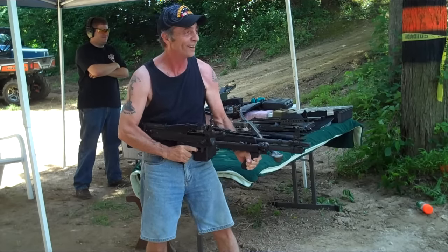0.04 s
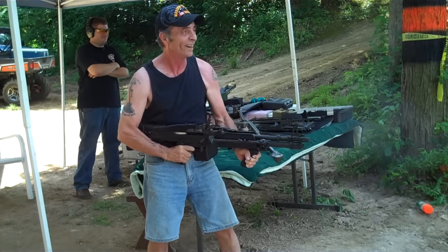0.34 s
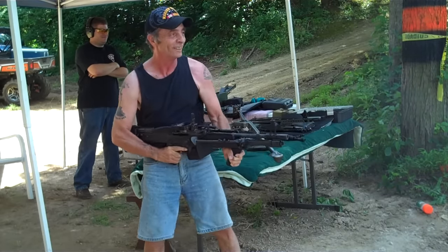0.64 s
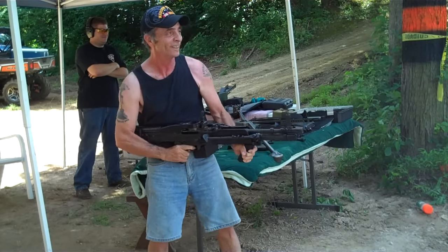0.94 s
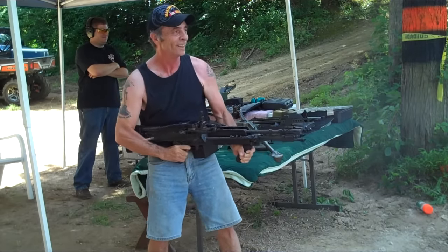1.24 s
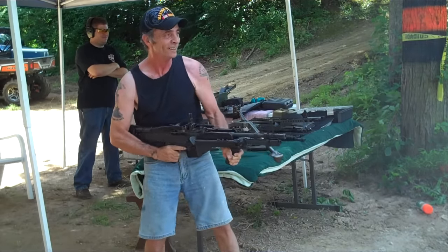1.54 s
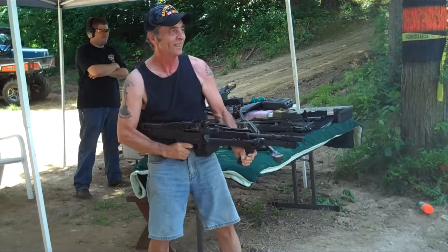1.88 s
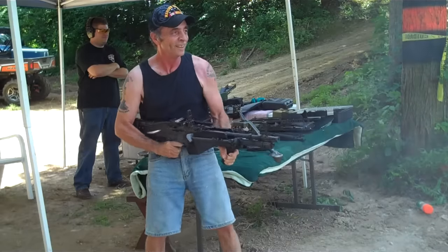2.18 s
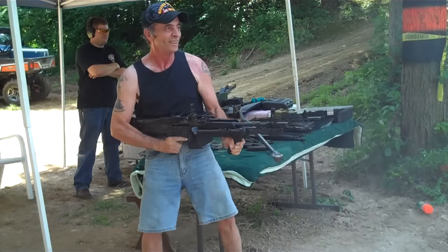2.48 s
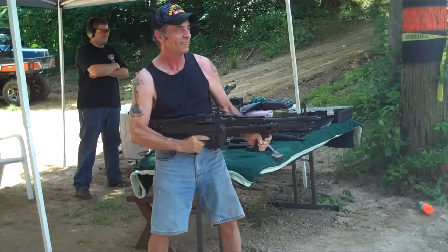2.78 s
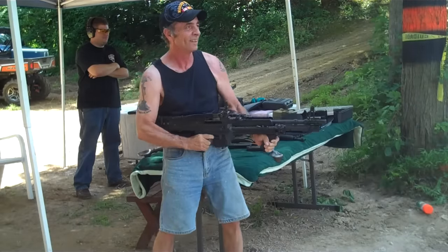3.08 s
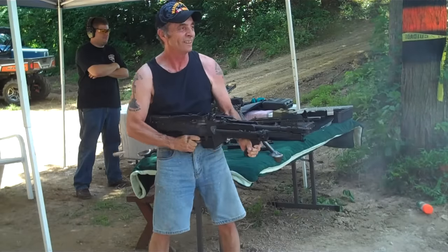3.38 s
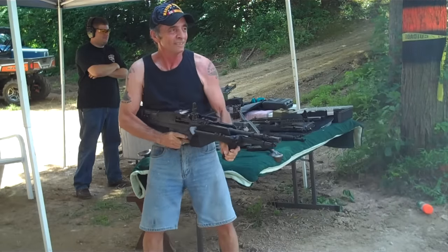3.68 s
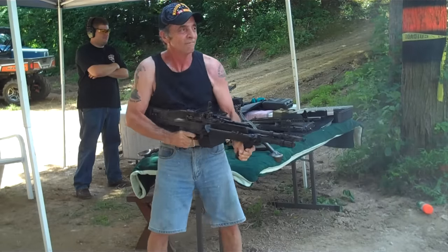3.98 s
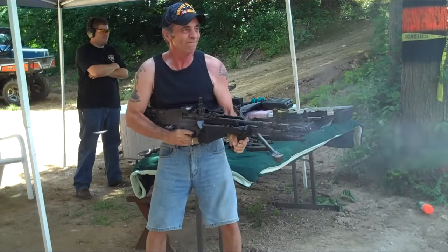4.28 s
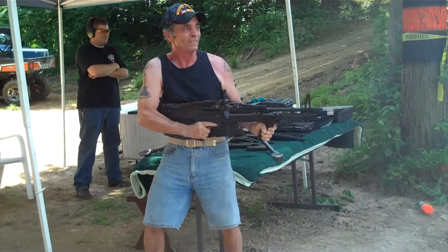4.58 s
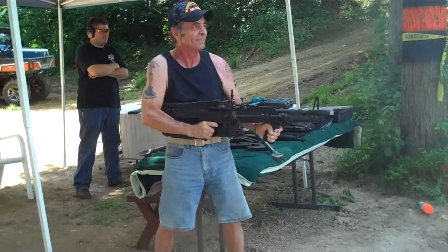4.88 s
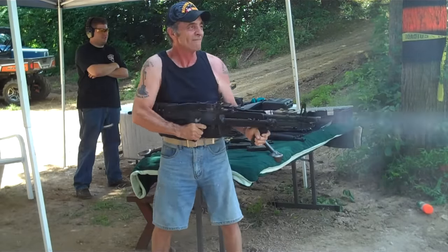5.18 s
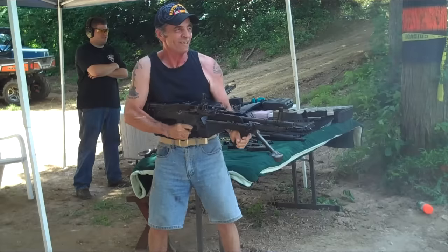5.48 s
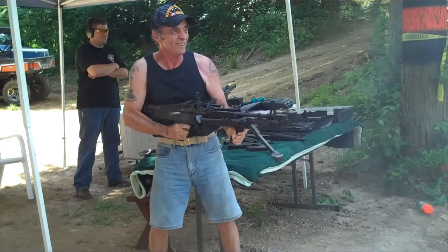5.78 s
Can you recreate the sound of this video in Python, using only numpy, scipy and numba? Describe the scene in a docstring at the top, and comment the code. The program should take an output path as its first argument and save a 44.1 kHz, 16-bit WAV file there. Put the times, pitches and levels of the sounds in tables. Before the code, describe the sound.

Six rapid bursts of close machine gun fire, with metallic bolt clacks, a rolling outdoor echo and the faint tinkle of empty cases.

```python
"""A faint hiss of leaves, then a steel clack and a loud burst from a belt-fed machine gun a few metres away.
It fires six bursts, about nine rounds a second. Each opens with the bolt, the sliding steel block that
loads the gun, running forward and slamming shut. Every blast bounces back from the ground, an earth
bank and wooded slopes, and a few empty brass cases tinkle down. It is all so loud that the
microphones of a small stereo camera overload and the camera turns its own volume down."""
import sys
import numpy as np
from scipy import signal
from scipy.fft import rfft, irfft
from scipy.io import wavfile
from scipy.ndimage import uniform_filter1d
from numba import njit

SR = 44100
rng = np.random.default_rng(int(sys.argv[2]) if len(sys.argv) > 2 else 0)


def unload_audio(sound):
    """Save the sound as a 16-bit wav file, at the path given as the first command line argument."""
    columns = np.transpose(np.atleast_2d(sound))
    # keep every value between -1 and 1, then stretch to whole-number steps
    steps = np.round(np.clip(columns, -1, 1) * 32767)
    wavfile.write(sys.argv[1], SR, steps.astype(np.int16))


N = 257263

# Levels are relative. A fade time (t60) is how long a sound takes to drop by 60 dB.
# tone colours, how strong each noise is from bass to treble: (frequency [Hz], level [dB])
AIR_COLOUR = [(18, -41), (30, -11), (172, 2), (656, -8), (806, -10), (917, -10.5), (6150, -24.5),
              (14000, -25)]
WOODS_COLOUR = [(60, -38), (110, -14.5), (200, -19), (270, -5.5), (390, -3), (465, -2), (560, 1.5),
                (750, -1.5), (950, -4.5), (1300, -6.5), (2500, -32), (6000, -56)]
SLAP_COLOUR = [(120, -7.5), (270, -3.5), (410, 0.5), (465, 9), (540, -1), (750, -1), (1000, -7.5),
               (2500, -28.5)]
LEAF_COLOUR = [(100, 13.5), (400, 12.5), (1000, 4), (2000, 7.5), (4000, 4.5), (6000, 0.5), (8000, -5),
               (10000, -7.5), (14000, -20)]
FAR_LEAF_COLOUR = [(200, -34), (800, 0.5), (2000, 8), (4000, 1), (6000, -6.5), (8000, -8.5), (10000, -18),
                   (14000, -87)]
TRUNK_COLOUR = [(300, -19), (550, 4.5), (780, 6.5), (1150, 4), (1800, -23), (4000, -39)]
GROUND_COLOUR = [(20, -24), (60, -5), (140, 7), (300, -4), (600, 11), (1000, 9.5), (2000, 0), (5000, 3)]
METAL_COLOUR = [(100, -43), (500, -7), (1000, 2.5), (2500, 5), (4000, -0.5), (6000, 2), (9000, -5.5),
                (14000, 3.5)]
GUST_COLOUR = [(25, -4), (40, -0.5), (70, -7.5), (130, -7), (300, -11), (1000, -32.5)]
CRACK_COLOUR = [(100, -24), (300, 2), (900, 4), (1500, 4.5), (3000, -5.5), (6000, -8.5), (9000, -7),
                (14000, -8)]
# separate echoes from the far slopes: (delay [s], level [dB])
SLOPE_ECHOES = [(.237, -22.5), (.337, -17), (.375, -18)]
# low pulses thrown back by the bank: (delay [s], pitch [Hz], half-length [s], level [dB])
BANK_PULSES = [(.073, 183, 0.0016, -2), (.085, 147, 0.0024, -10), (.0895, 255, .005, -3),
               (.093, 299.8, 0.052, -17.5)]
# empty cases landing: (time [s], level [dB], pitch multiplier)
CASE_LANDINGS = [(2.785, -42, .96), (3.0655, -28, 1), (4.909, -39, .94)]
# ringing tones of a brass case and of the gun's steel body: (base pitch [Hz], level [dB], fade time [s])
BRASS_TONES = [(5940, -17, .35), (9700, -12, .2), (11150, 1, .35), (14070, 9, .4)]
GUN_BODY_TONES = [(1270, -42, 0.051), (1823, -22, 0.45), (2240, -36, 0.21), (2770, -33, 0.074),
                  (5620, -16, 0.075), (5630, -38, .08)]
# bursts of fire; the bolt "feeds" when it meets the ammunition belt, and a "lead" is time before firing:
# (first shot [s], last shot [s], number of shots, feed lead [s], feed level [dB], lock level [dB])
GUN_BURSTS = [(.376, .4897, 2, .042, 4, 7), (1.2358, 1.462, 3, .0425, 4, 6.5),
              (1.9777, 2.4177, 5, .0412, -5, -1), (3.2339, 3.5678, 4, .0505, 2.5, 3),
              (4.0373, 4.476, 5, .0392, -7.5, -5.5), (5.0395, 5.727, 7, .0418, -4.5, 4)]
# the small hollows in front of the microphones, left then right: (resonance [Hz], width [Hz])
MIC_PORTS = [(7800, 1120), (6160, 1100)]


def undb(db):
    """Turn decibels into a number to multiply by."""
    return 10 ** (np.asarray(db) / 20)


def noise(colour, apart_hz, size=N):
    """Stereo noise of strength 1; left and right are alike well below apart_hz and unrelated above."""
    f = np.fft.rfftfreq(size, 1 / SR) + 1
    hz, db = np.transpose(colour)
    bass_cut = np.minimum(f / hz[0], 1) ** 2
    gain = undb(np.interp(np.log(f), np.log(hz), db)) * bass_cut
    mid, side = rfft(rng.standard_normal((2, size)))
    side = side * f / np.hypot(f, apart_hz)
    x = irfft(np.array([mid + side, mid - side]) * gain, size)
    return x / x.std()


def add(out, at_s, sound):
    """Mix a sound in at the given time."""
    i = int(at_s * SR)
    out[..., i:i + sound.shape[-1]] += sound[..., :N - i]


def swell(t, rise_s, t60_s):
    """A loudness curve that builds up, peaks at 1 and dies away."""
    curve = (1 - np.exp(-(t / rise_s) ** 2)) * undb(-60 * t / t60_s)
    return curve / curve.max()


def flicker(depth_db, smooth_samples, size):
    """A random wobble in loudness that makes a sound rough."""
    wobble = uniform_filter1d(rng.standard_normal(size), size=smooth_samples)
    return undb(depth_db * wobble / wobble.std())


def repeat(shots, response):
    """Play the same stereo sound after every shot."""
    return signal.fftconvolve(shots[None], response, axes=1)[:, :N]


def pile_up(shots, envelope):
    """Start a loudness curve at every shot; where unrelated noises overlap, their powers add."""
    return np.sqrt(np.abs(signal.fftconvolve(shots ** 2, envelope ** 2)[:N]))


def ring(tones, pitch_ratio, t):
    """Struck metal rings with a few fading tones, which reach the two microphones out of step."""
    phases = rng.uniform(0, 2 * np.pi, (len(tones), 2, 1))
    return sum(undb(db - 60 * t / t60_s) * np.sin(2 * np.pi * hz * pitch_ratio * t + phase)
               for (hz, db, t60_s), phase in zip(tones, phases))


def outdoors():
    """Quiet air, a faint steady whine, and an opening hiss from the trees that dies away."""
    t = np.arange(N) / SR
    air = undb(-56) * noise(AIR_COLOUR, apart_hz=1500)
    whine = undb(-64) * np.sin(2 * np.pi * 819 * t)
    hiss = undb(-54.5 - 60 * t / 0.71) * noise(FAR_LEAF_COLOUR, apart_hz=2500)
    return air + whine + hiss


def hills(shots):
    """Wooded slopes send the middle pitches of each blast back as a long roll and a few hollow slaps."""
    t = np.arange(3 * SR) / SR
    roll = pile_up(shots, swell(t, rise_s=0.048, t60_s=4.22)) * noise(WOODS_COLOUR, apart_hz=2860)
    slap_curve = sum(undb(db) * swell(np.maximum(t - delay_s, 0), rise_s=0.0038, t60_s=0.14)
                     for delay_s, db in SLOPE_ECHOES)
    slaps = pile_up(shots, slap_curve) * noise(SLAP_COLOUR, apart_hz=2700)
    return undb(-24) * roll + slaps


def leaves(shots):
    """Leaves scatter the treble: a loud wash from the nearest trees, a long hiss from those behind."""
    t = np.arange(3 * SR) / SR
    near = pile_up(shots, swell(t, rise_s=0.022, t60_s=0.29)) * noise(LEAF_COLOUR, apart_hz=1820)
    middle = pile_up(shots, swell(t, rise_s=0.091, t60_s=1.125)) * noise(LEAF_COLOUR, apart_hz=2530)
    far = pile_up(shots, swell(t, rise_s=0.12, t60_s=5.2)) * noise(FAR_LEAF_COLOUR, apart_hz=2600)
    return undb(-2.5) * near + undb(-17) * middle + undb(-30) * far


def trunks(shots):
    """Tree trunks throw the middle pitches of each blast back as quick, ragged claps."""
    t = np.arange(16384) / SR
    ragged = flicker(depth_db=2.6, smooth_samples=120, size=len(t))
    cut_short = 1 / (1 + (t / 0.092) ** 6)
    claps = swell(t, rise_s=0.02, t60_s=0.73) * cut_short * ragged
    return undb(-10.5) * pile_up(shots, claps) * noise(TRUNK_COLOUR, apart_hz=700)


def earth_bank(shots):
    """The earth bank sends back only the bass, as a short boom just before the next shot is due."""
    t = np.arange(8192) / SR
    boom = np.zeros(len(t))
    for delay_s, hz, half_length_s, db in BANK_PULSES:
        hump = np.exp(-((t - delay_s) / half_length_s) ** 2)
        boom += undb(db) * hump * np.cos(2 * np.pi * hz * (t - delay_s))
    return repeat(shots, np.array([boom, boom]))


def ground(shots):
    """The ground nearby returns a dense thud, partly the same on every shot, and a brief rumble."""
    t = np.arange(SR) / SR
    cut_short = 1 / (1 + (t / 0.1) ** 6)
    thud_curve = swell(t, rise_s=0.013, t60_s=0.62) * cut_short
    rumble_curve = undb(-9.5) * swell(t, rise_s=0.2, t60_s=0.64)
    same_part = repeat(shots, thud_curve * noise(GROUND_COLOUR, apart_hz=398, size=len(t)))
    varying_part = pile_up(shots, thud_curve + rumble_curve) * noise(GROUND_COLOUR, apart_hz=169)
    return undb(-19) * same_part + undb(-13.5) * varying_part


def cases():
    """Empty brass cases thrown out by the gun land with a tick and a thin ring."""
    out, t = np.zeros((2, N)), np.arange(SR // 2) / SR
    for at_s, db, pitch_ratio in CASE_LANDINGS:
        tick = swell(t, rise_s=0.00045, t60_s=0.02) * noise(METAL_COLOUR, apart_hz=3500, size=len(t))
        add(out, at_s, undb(db) * (undb(6) * tick + ring(BRASS_TONES, pitch_ratio, t)))
    return out


def bolt_blows():
    """The four knocks of the bolt before each burst: (time [s], level [dB], fade time [s])."""
    blows = []
    for first_s, _, _, feed_lead_s, feed_db, lock_db in GUN_BURSTS:
        blows += [(first_s - 0.064, -17, 0.12),  # slips off its catch
                  (first_s - feed_lead_s, feed_db, 0.066),  # pushes a round out of the belt
                  (first_s - 0.29 * feed_lead_s, lock_db, 0.085),  # locks shut
                  (first_s - 0.0037, 3, 0.077)]  # drives the firing pin home
    return blows


def bolt():
    """Steel parts strike and make the gun's body ring, then chatter as the belt is dragged along."""
    out, t = np.zeros((2, N)), np.arange(8192) / SR
    chatter = undb(-19) * swell(t, rise_s=0.012, t60_s=0.2)
    for at_s, db, t60_s in bolt_blows():
        strike = swell(t, rise_s=0.00052, t60_s=t60_s)
        rough = flicker(depth_db=1.3, smooth_samples=90, size=len(t))
        clatter = rough * (strike + chatter) * noise(METAL_COLOUR, apart_hz=3900, size=len(t))
        clang = ring(GUN_BODY_TONES, pitch_ratio=0.98, t=t)
        add(out, at_s, undb(db) * (undb(-4) * clatter + undb(-1.5) * clang))
    return out


def firing(first_db=3, middle_db=2.1, last_db=2, quicken_s=0.0006):
    """One spike per shot; within a burst, each gap is quicken_s shorter than the one before."""
    shots = np.zeros(N)
    for first_s, last_s, count, *_ in GUN_BURSTS:
        k = np.arange(count)
        times = np.linspace(first_s, last_s, count) + quicken_s * k * k[::-1] / 2
        levels = [first_db] + [middle_db] * (count - 2) + [last_db]
        for at_s, db in zip(times, levels):
            add(shots, at_s, undb([db]))
    return shots


def muzzle_blast(shots, push_s=0.00074):
    """The bang: air is pushed out and sucked back, escaping gas cracks, a gust hits each microphone."""
    t = np.arange(16384) / SR
    wave = -(1 - t / push_s) * np.exp(-t / push_s)
    punch = repeat(shots, np.array([wave, wave]))
    crack = pile_up(shots, swell(t, rise_s=0.00056, t60_s=0.14)) * noise(CRACK_COLOUR, apart_hz=1480)
    cut_short = 1 / (1 + (t / 0.12) ** 12)
    gust_curve = swell(t, rise_s=0.0022, t60_s=3.8) * cut_short
    gust = pile_up(shots, gust_curve) * noise(GUST_COLOUR, apart_hz=3)
    return undb(-1.5) * punch + undb(-4.5) * crack + undb(-12) * gust


def scene():
    """The quiet outdoors, the echoes and the gun itself, added together."""
    shots = firing()
    echoes = hills(shots) + leaves(shots) + trunks(shots) + earth_bank(shots) + ground(shots)
    return outdoors() + echoes + cases() + bolt() + muzzle_blast(shots)


def mic_port(x, hz, width_hz):
    """The hollow in front of a microphone rings at its own pitch and muffles anything higher."""
    pole = np.exp((2j * np.pi * hz - np.pi * width_hz) / SR)
    feedback = np.poly([pole, np.conj(pole)]).real
    return signal.lfilter([feedback.sum()], feedback, x)


@njit
def follow(x, rise_s, fall_s):
    """Track a level like a meter needle, with one speed going up and another coming down."""
    out, level = np.empty(len(x)), 0.
    for i in range(len(x)):
        response_s = rise_s if x[i] > level else fall_s
        level += (x[i] - level) / (response_s * SR)
        out[i] = level
    return out


def auto_volume(x, lag_s=0.0073, threshold=0.16, max_cut_db=6):
    """Loud bass turns the volume down a little late, so the start of the first blast slips through."""
    t = np.arange(N) / SR
    bass = signal.sosfilt(signal.butter(2, 600, fs=SR, output="sos"), x.mean(axis=0))
    loudness = follow(np.abs(bass), rise_s=0.0093, fall_s=0.21)
    gain = np.clip(threshold / (loudness + 1e-9), undb(-max_cut_db), 1)
    return np.interp(t - lag_s, t, gain)


def record(dry, left_db=-0.9, soften_hz=13000, top_hz=14150):
    """The camera colours the sound, squashes its peaks, turns it down and cuts the highest treble."""
    at_mics = np.array([mic_port(channel, hz, width) for channel, (hz, width) in zip(dry, MIC_PORTS)])
    soften = signal.butter(1, [18, soften_hz], "band", fs=SR, output="sos")
    squashed = signal.sosfilt(soften, np.tanh(at_mics))  # the microphone amplifiers overload
    balance = undb([[left_db], [0]])
    clipped = np.clip(balance * auto_volume(at_mics) * squashed, -1, 1)
    treble_cut = signal.ellip(8, 0.2, 70, top_hz, fs=SR, output="sos")
    return signal.sosfilt(treble_cut, clipped)


dry = scene()
out = record(dry)
unload_audio(out)
```